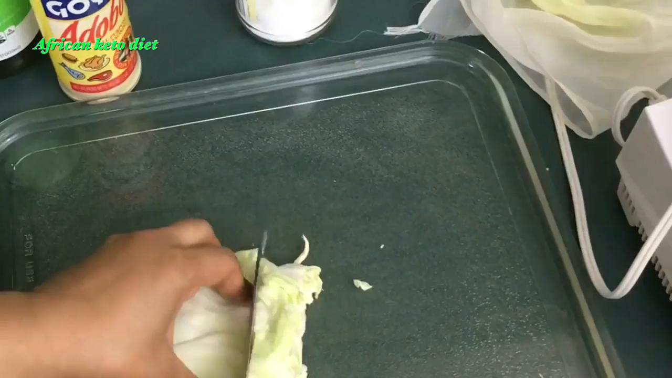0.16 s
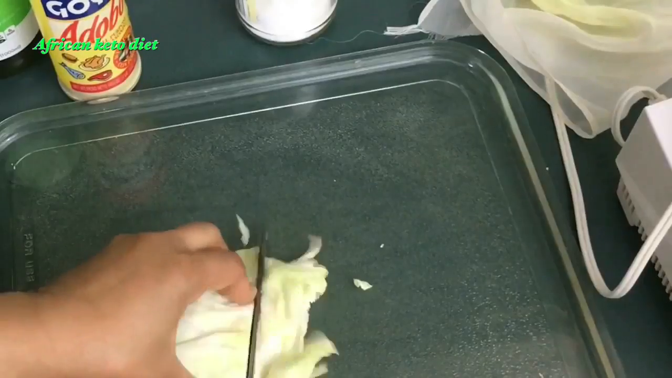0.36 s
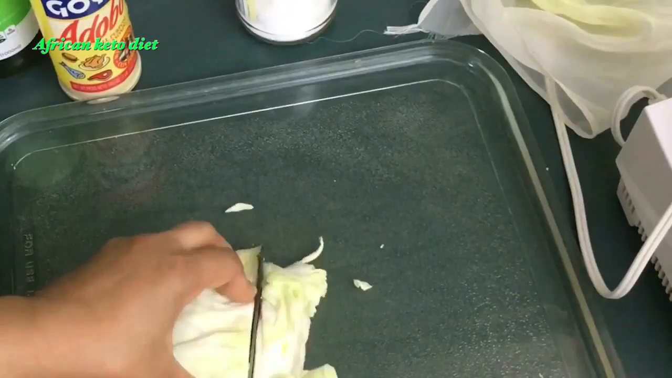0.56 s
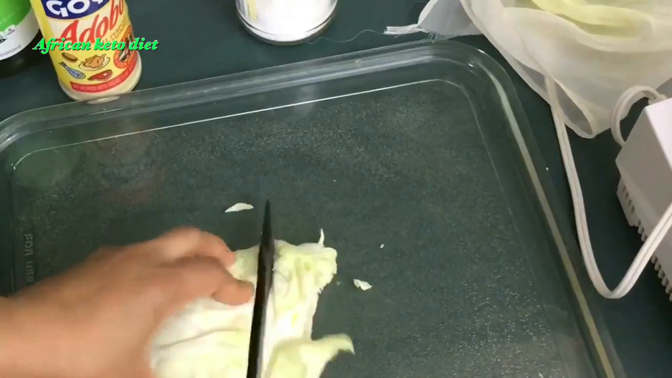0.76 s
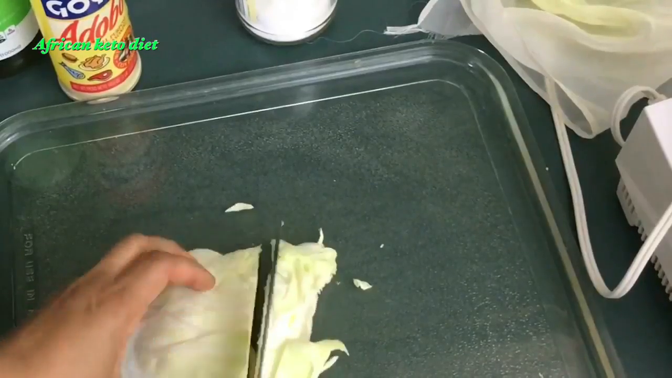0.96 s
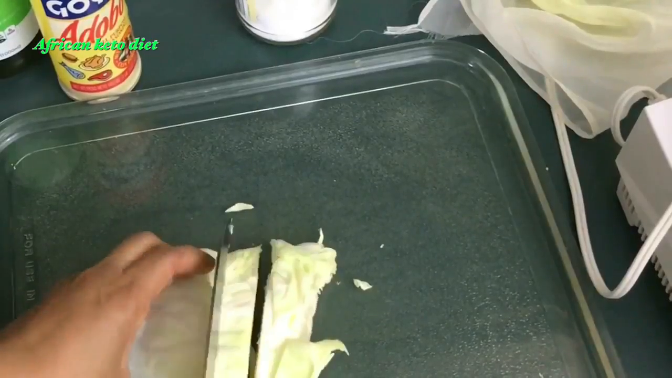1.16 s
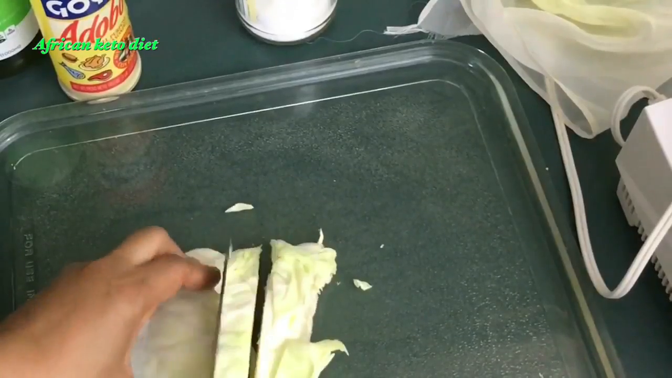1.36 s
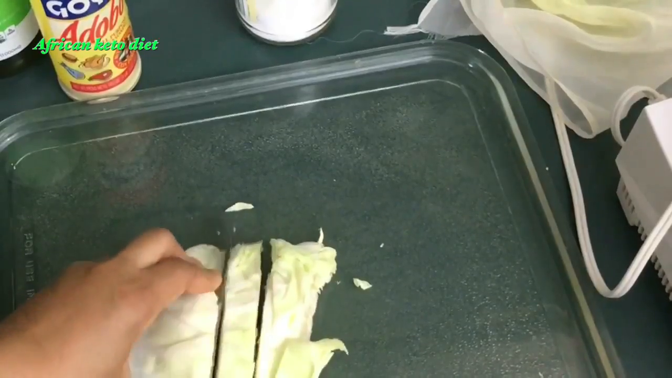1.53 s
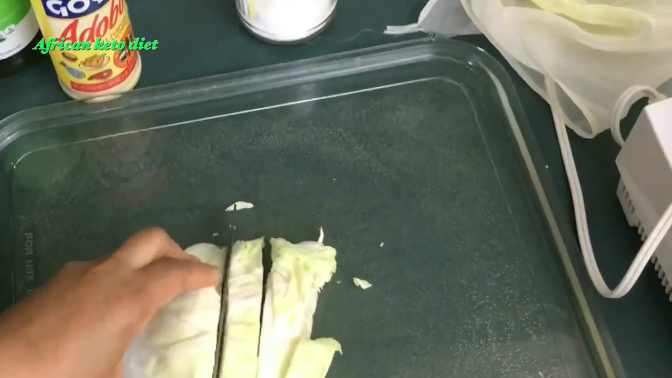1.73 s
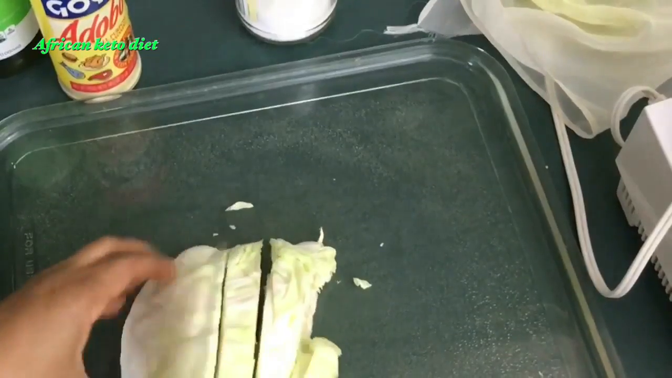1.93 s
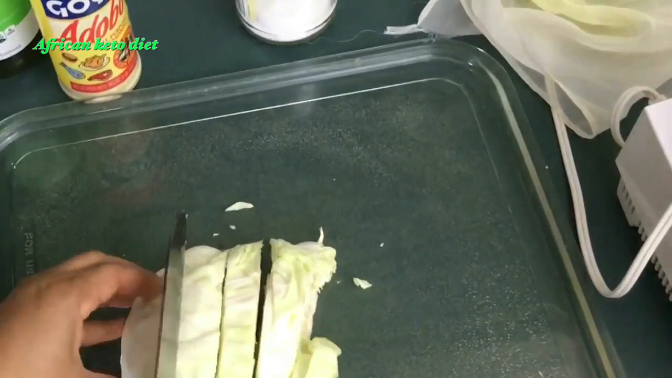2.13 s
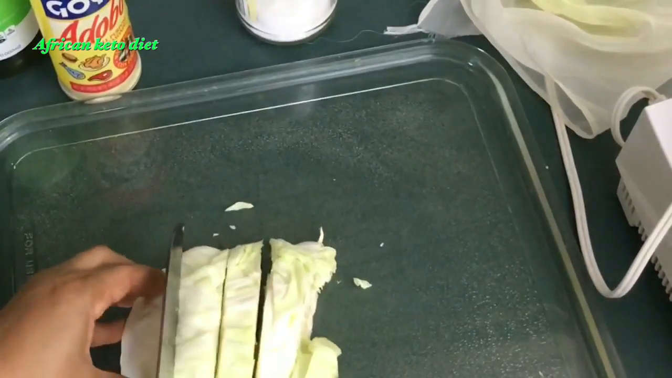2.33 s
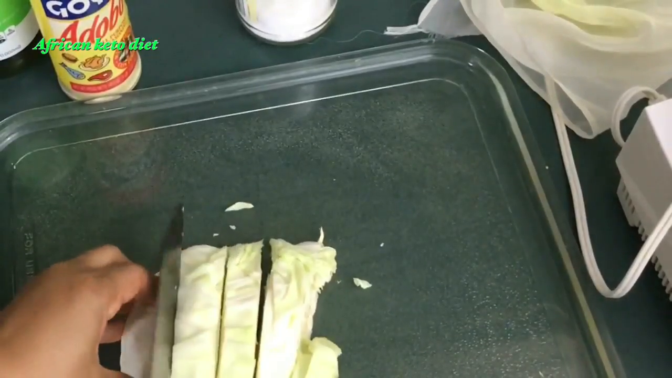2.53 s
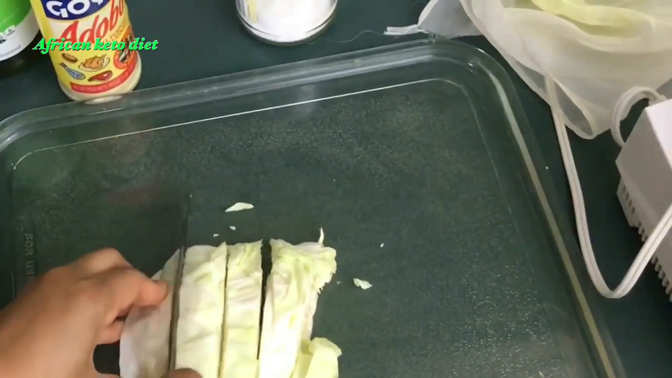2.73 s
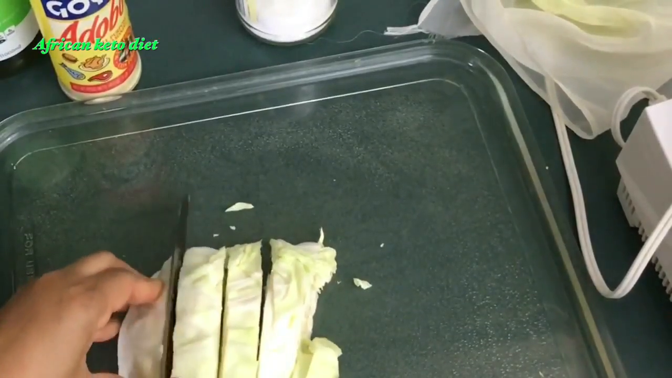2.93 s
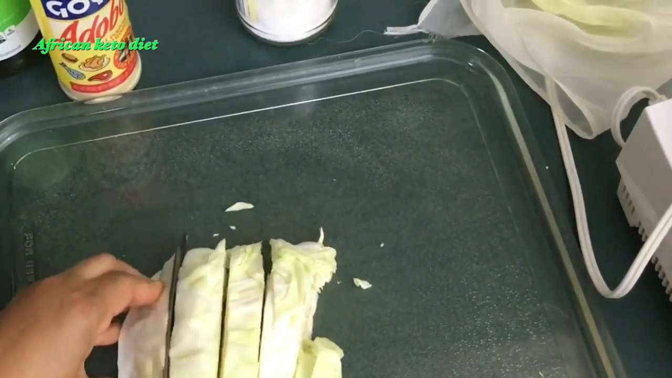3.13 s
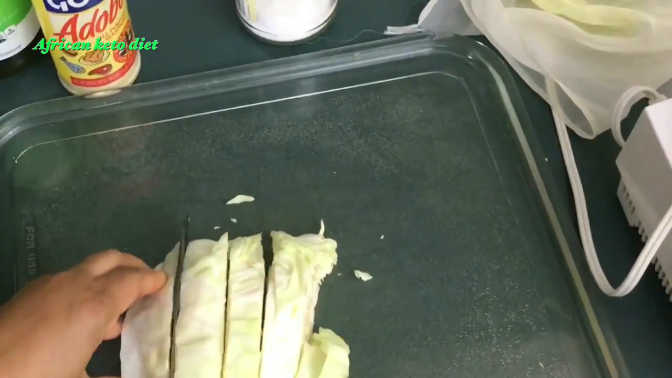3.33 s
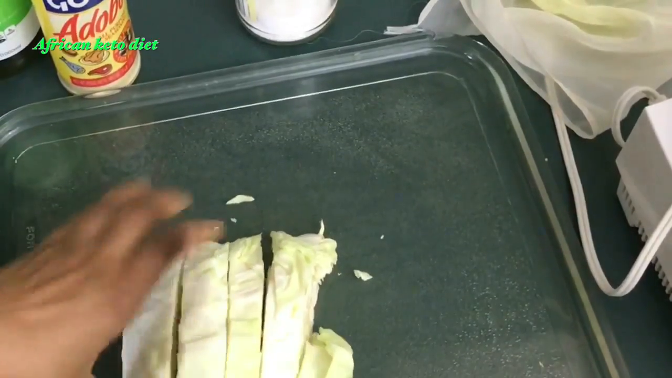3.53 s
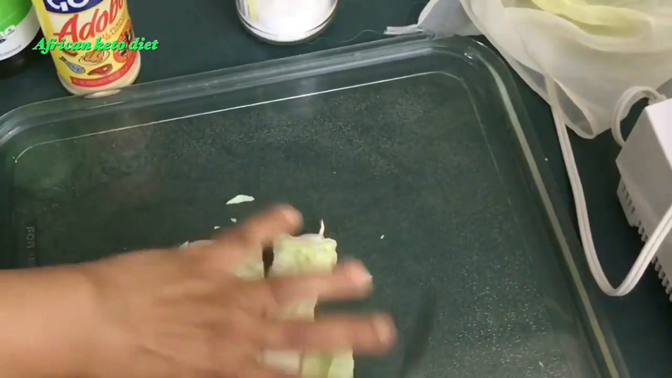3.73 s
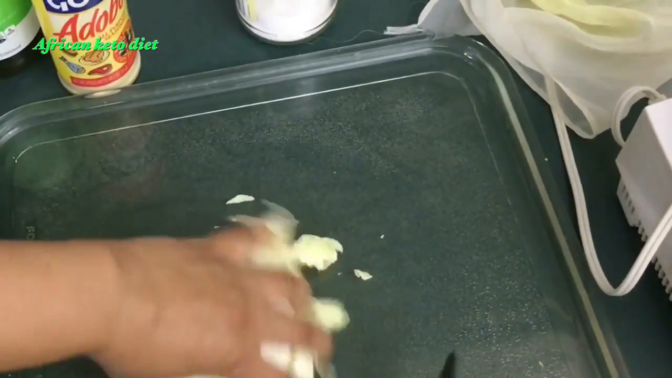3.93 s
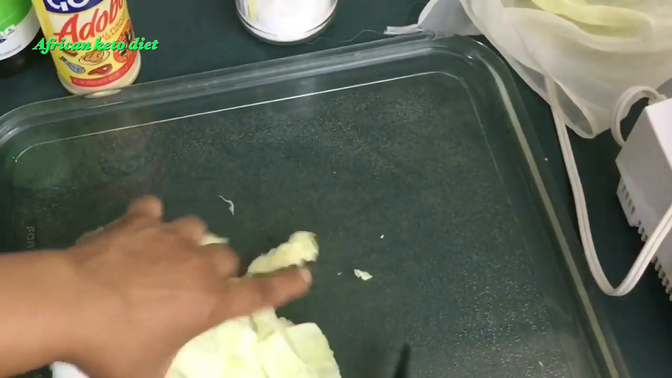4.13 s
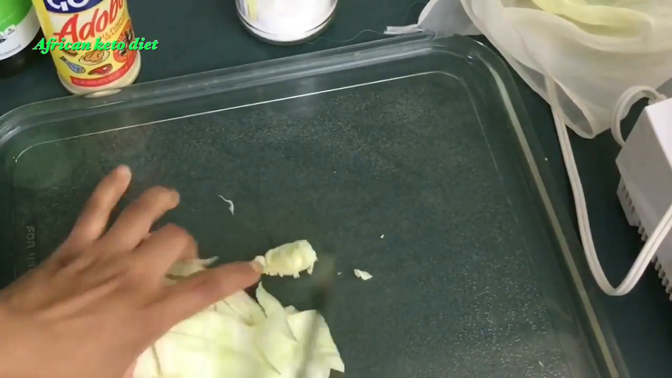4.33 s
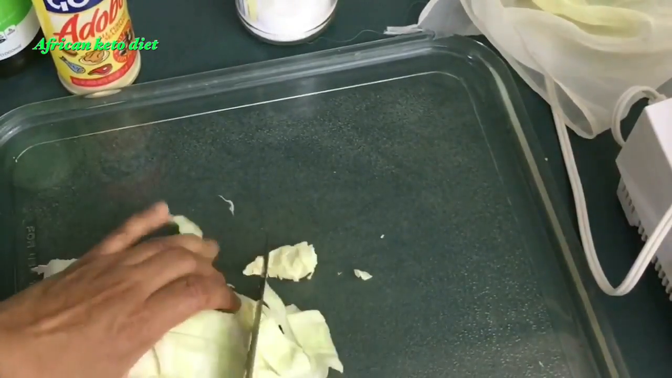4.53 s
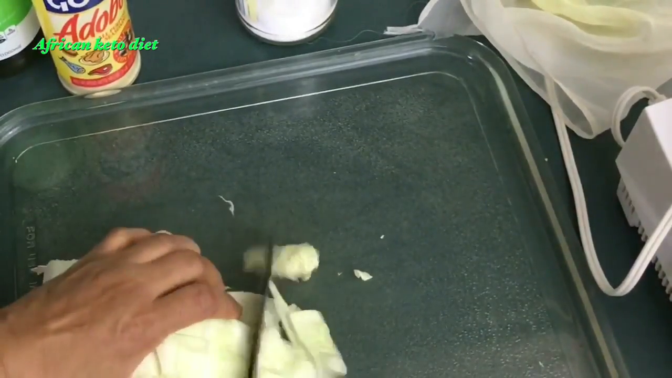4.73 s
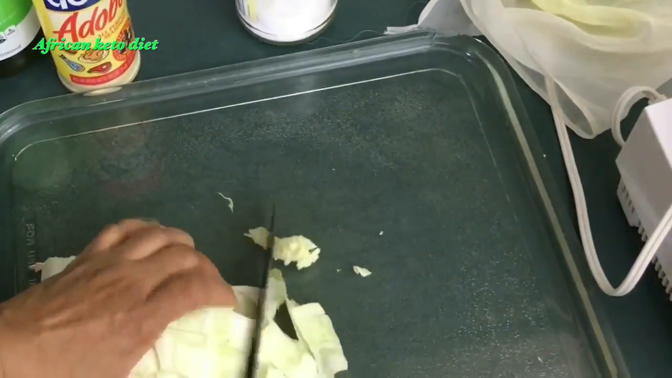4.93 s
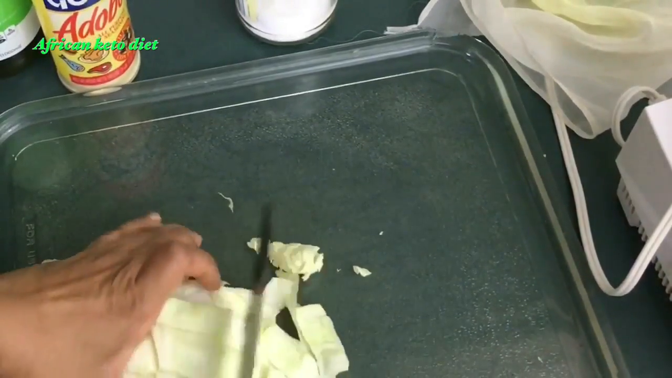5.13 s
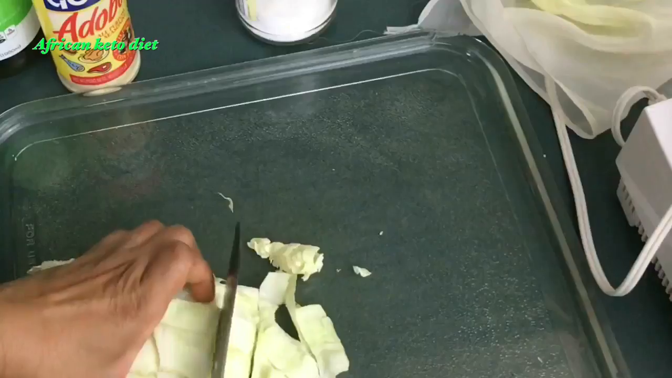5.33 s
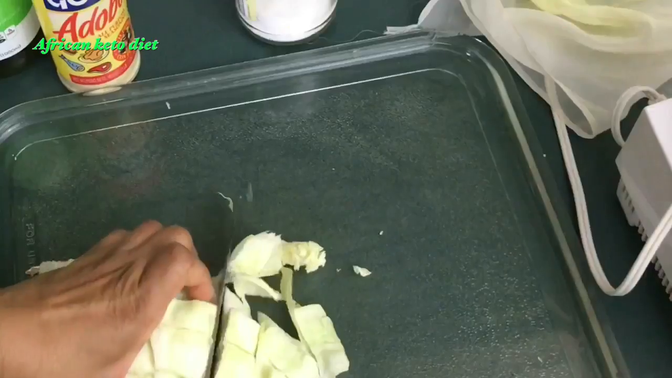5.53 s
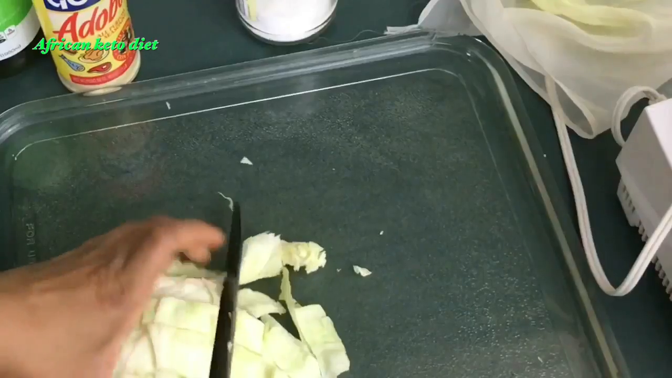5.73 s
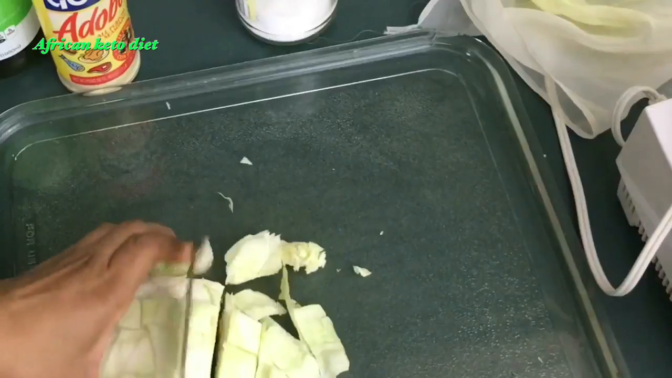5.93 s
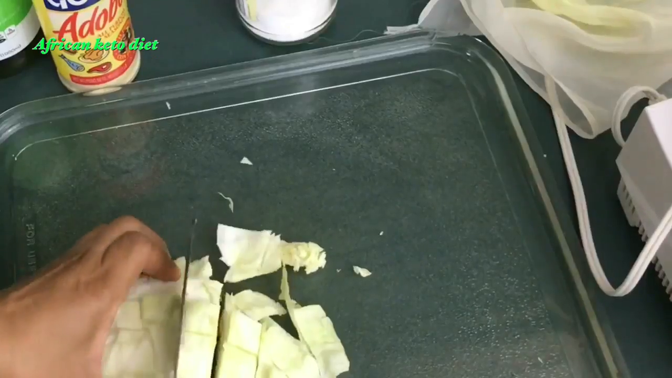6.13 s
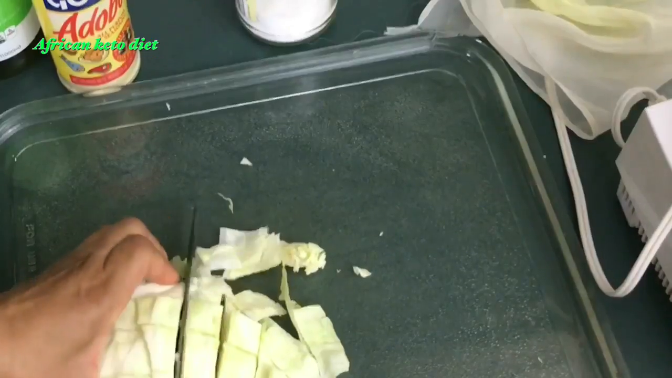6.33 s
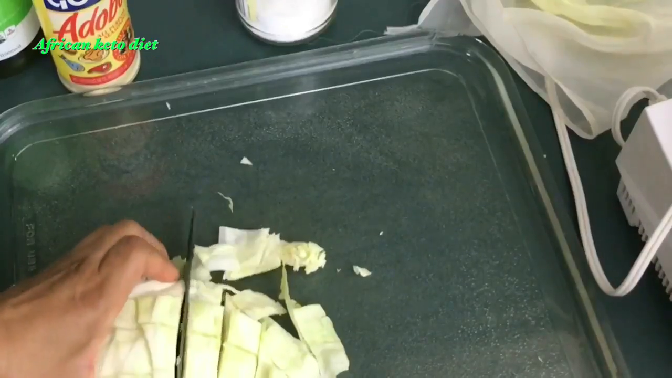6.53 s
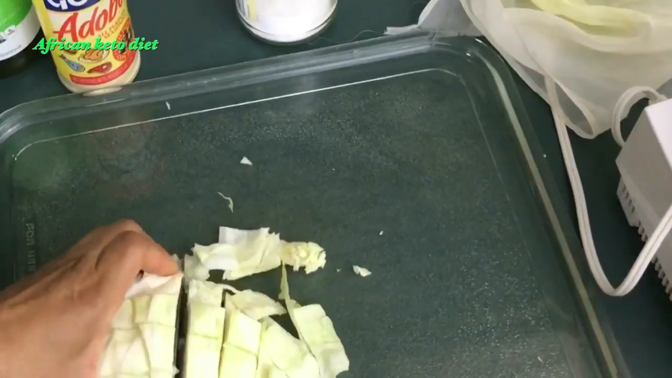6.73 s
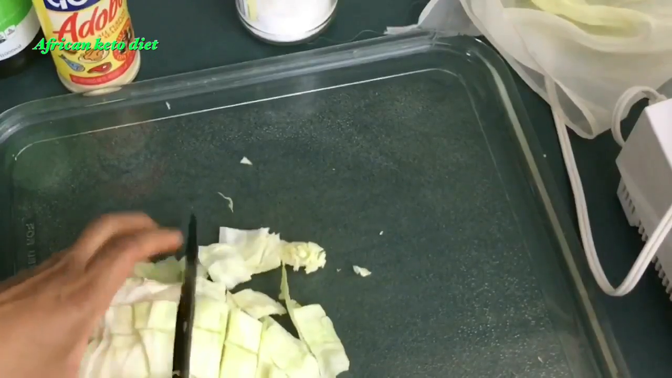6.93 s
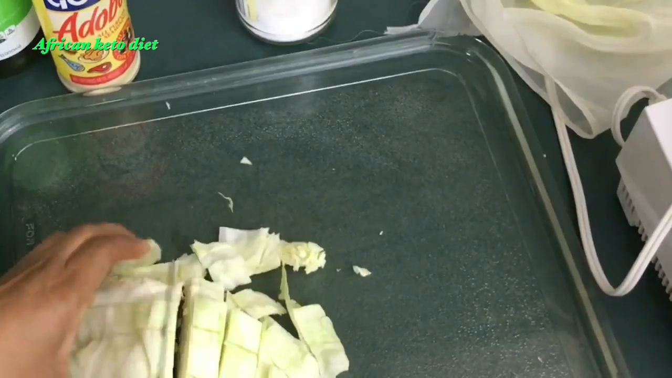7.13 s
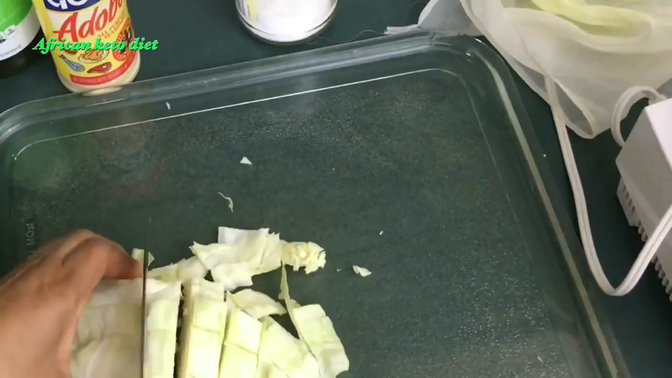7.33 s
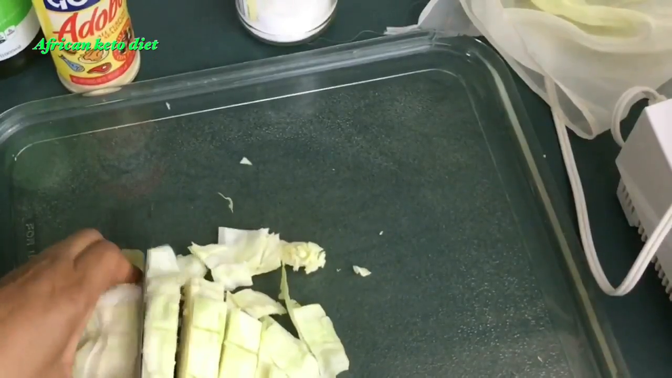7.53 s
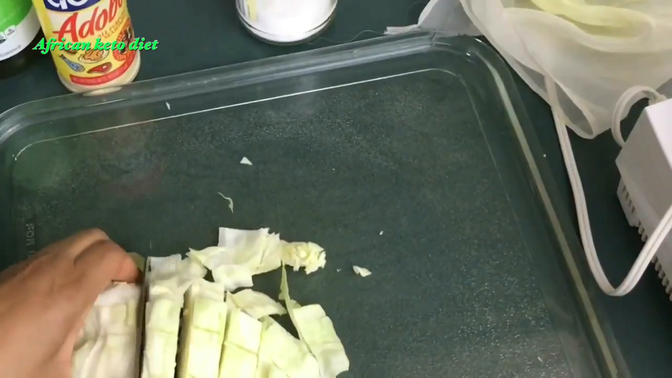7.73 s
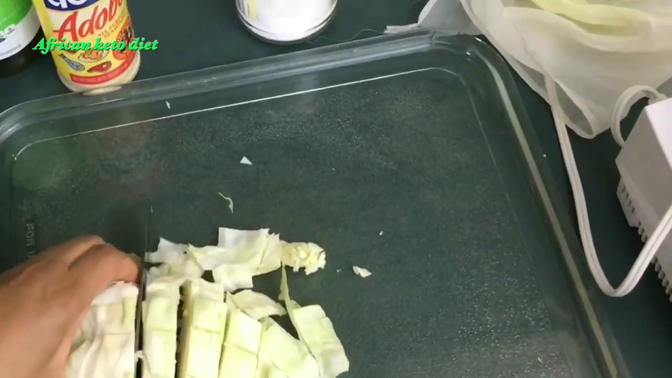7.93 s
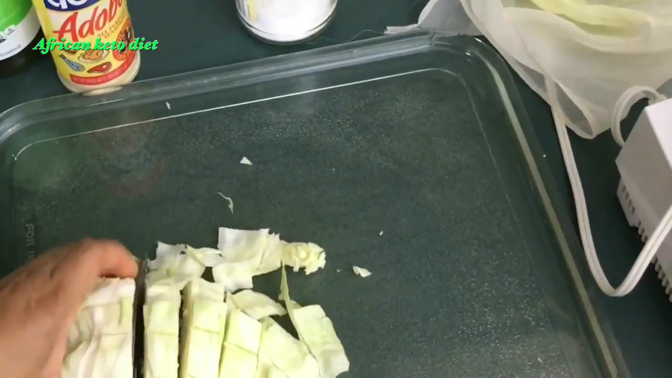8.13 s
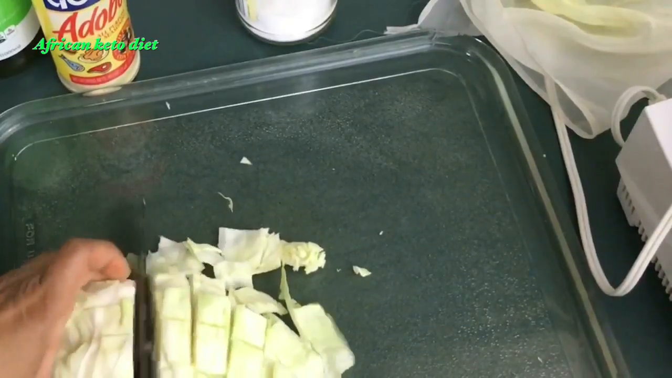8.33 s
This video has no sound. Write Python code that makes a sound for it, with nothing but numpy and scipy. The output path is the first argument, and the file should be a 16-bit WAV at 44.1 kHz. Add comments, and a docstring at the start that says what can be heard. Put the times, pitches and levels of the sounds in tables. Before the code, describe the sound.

Crisp leaves tear and thick ribs pop under a knife, each cut ending abruptly as steel knocks on glass. About nine heavy knocks come unevenly, roughly a second apart at first and closer in the middle, with small taps and rubbing between. The close microphone clips on the hardest hits; a short hard-surfaced kitchen echo follows, above faint air and low bumps.

```python
"""A small kitchen: a knife cuts a cabbage in a glass dish on a counter, close to the microphone.
In each stroke random clicks crunch as leaves and noise bursts snap as ribs; then steel knocks on glass,
a noise clack with ringing sine modes that overloads the microphone into flat peaks.
Scrapes of stick-slip clicks, narrow squeaks, a low judder and counter rumble lie beneath.
Behind it all are quiet air in shaped noise and the kitchen's echo in decaying noise bands."""
import sys
import numpy as np
from scipy import signal
from scipy.fft import rfft, irfft
from scipy.io import wavfile
from scipy.ndimage import uniform_filter1d

SR = 44100
rng = np.random.default_rng(int(sys.argv[2]) if len(sys.argv) > 2 else 0)


def file_out(sig):
    """Save sig as 16-bit WAV at sys.argv[1]."""
    # one column per channel
    cols = np.atleast_2d(sig).T
    # limit, then scale
    lim = np.clip(cols, -1, 1)
    pcm = np.round(lim * 32767).astype(np.int16)
    wavfile.write(sys.argv[1], SR, pcm)


N = 373527
TIME = np.arange(N) / SR


def from_db(db):
    """Decibels to gain."""
    return 10 ** (np.asarray(db) / 20)


def rms_one(x):
    """Scale to rms 1."""
    return x / np.sqrt(np.mean(x ** 2) + 1e-20)


def at_hz(points, hz):
    """Read a curve on a log-frequency axis."""
    freq, value = np.transpose(points)
    return np.interp(np.log(np.maximum(hz, 1)), np.log(freq), value)


def add(out, start_s, sound):
    """Mix a sound in at its moment."""
    i = max(0, round(start_s * SR))
    out[i:i + len(sound)] += sound[:N - i]


def colour(x, spectrum, size=2048):
    """Causal (minimum-phase) filter with the given spectrum."""
    level_db = at_hz(spectrum, np.fft.rfftfreq(size, 1 / SR))
    cepstrum = irfft(np.log(from_db(level_db)))
    # fold the cepstrum forward in time
    cepstrum[1:size // 2] *= 2
    cepstrum[size // 2 + 1:] = 0
    response = irfft(np.exp(rfft(cepstrum)))
    return signal.oaconvolve(x, response)[:len(x)]


def band_filter(x, low_hz, high_hz):
    """Second-order Butterworth design keeping one band of a sound."""
    sos = signal.butter(2, [low_hz, high_hz], "band", fs=SR, output="sos")
    return signal.sosfilt(sos, x)


def fade(t, t60):
    """Exponential decay, 60 dB in t60 seconds."""
    return np.exp(-np.log(1000) * t / max(t60, 1e-3))


def ring(clicks, hz, t60):
    """Two-pole resonator: a unit click sets a decaying sine of height 1 ringing."""
    r, w = fade(1 / SR, t60), 2 * np.pi * hz / SR
    return signal.lfilter([0, np.sin(w)], [1, -2 * r * np.cos(w), r * r], clicks + 1e-18)


def stroke_gain(starts, lengths, levels_db, swells_db, attack_s, release_t60):
    """Every stroke sets in, swells or sags evenly over its length, then dies away."""
    t, gain = TIME[:SR], np.zeros(N)
    for start_s, length_s, level_db, swell_db in np.broadcast(starts, lengths, levels_db, swells_db):
        progress = np.minimum(t / length_s, 1)
        held = from_db(level_db + swell_db * (progress - .5))
        release = fade(np.maximum(t - length_s, 0), release_t60)
        add(gain, start_s, held * (1 - np.exp(-t / attack_s)) * release)
    return gain


def grains(per_s, spread_db):
    """Random clicks of uneven size, with a steady power over a few hundredths of a second."""
    born = rng.random(N) < per_s / SR
    size = from_db(spread_db * np.minimum(rng.exponential(1, N), 4))
    clicks = born * size * rng.choice([-1, 1], N)
    power = np.abs(uniform_filter1d(clicks ** 2, size=1300))
    return clicks / np.sqrt(power + 1e-6)


def near_echoes(x, t60, wet_db):
    """Reflections from the dish, the hand and the counter smear each click over milliseconds."""
    t = TIME[:SR // 10]
    smear = rng.standard_normal(len(t)) * fade(t, t60)
    smear *= from_db(wet_db) / np.linalg.norm(smear)
    smear[0] += 1  # the direct sound
    return signal.oaconvolve(x, smear / np.linalg.norm(smear))[:len(x)]


# clear modes of the glass dish: pitch_hz, level_db, ring_t60_s
GLASS_MODES = [(412, -4, .2), (515, -6, .22), (645, -2, .22), (895, -2, .22), (1010, -6, .2),
               (1260, -4, .17), (1700, 0, .15), (2312, -8, .15), (2669, -6, .2), (3475, -7, .17),
               (3766, -4, .17), (3951, -2, .19), (4048, -4, .17), (4546, -6, .15), (5215, -5, .15),
               (5359, -3, .15), (5544, -7, .15), (6078, -4, .16), (6695, -4, .16), (6845, -6, .16),
               (7005, -4, .15), (7515, -11, .14), (7660, -11, .14), (8412, -5, .15), (8600, -9, .15),
               (8968, -11, .13), (9275, -2, .15), (10965, -9, .13), (11167, -11, .13), (13230, -7, .12)]


def through_dish(x, boost_db, width_hz=45):
    """The dish lifts whatever excites it at its own modes."""
    peaks = 0
    for pitch_hz, level_db, _ in GLASS_MODES:
        width = width_hz * (1 + pitch_hz / 9000)  # high modes are broader
        b, a = signal.iirpeak(pitch_hz, pitch_hz / width, fs=SR)
        peaks = peaks + from_db(level_db) * signal.lfilter(b, a, x)
    return x + from_db(boost_db) * peaks


# still air of the kitchen, relative spectrum: pitch_hz, level_db (per Hz)
AIR_SPECTRUM = [(15, -51), (25, -10.5), (76, -2.5), (114, -13), (236, -6), (427, -20.5), (936, -19.5),
                (1560, -24), (1740, -22.5), (2610, -30.5), (7510, -33), (8140, -33.5), (10400, -39.5),
                (14800, -38), (16000, -43)]


def kitchen_air(level_db=-43):
    """Steady noise shaped like the still air of the kitchen."""
    return from_db(level_db) * rms_one(colour(rng.standard_normal(N), AIR_SPECTRUM, size=8192))


# colour of the kitchen's echo: pitch_hz, level_db (per Hz)
ECHO_SPECTRUM = [(80, 15), (400, -1.5), (1200, 4), (3800, 4), (6500, -4), (10000, -8.5), (16000, -19)]
# how long the echo lasts: pitch_hz, decay_t60_s
ECHO_DECAY = [(100, 0.68), (600, 0.47), (3500, 0.57), (7000, 0.49), (15000, 0.58)]


def kitchen_echo(build_s=0.0028):
    """The room's answer to a click builds up after the first wall, each band of noise with its own decay."""
    t, response = TIME[:int(.8 * SR)], 0
    edges_hz = 45 * 2 ** np.arange(0, 9, .5)  # half-octave bands
    for low, high in zip(edges_hz, edges_hz[1:]):
        hz = np.sqrt(low * high)
        band = band_filter(rng.standard_normal(len(t)), low, high)
        shape = fade(t, at_hz(ECHO_DECAY, hz)) * (1 - np.exp(-(t / build_s) ** 2))
        response = response + from_db(at_hz(ECHO_SPECTRUM, hz)) * band * shape / np.linalg.norm(shape)
    return response


def kitchen(x):
    """What the room returns of a running sound."""
    return signal.oaconvolve(x, kitchen_echo())[:N]


# hand and blade settle on the cabbage with a soft push: start_s, length_s, level_db
PUSHES = [(0.0, 0.026, -35.5), (0.15, 0.06, -40), (1.226, 0.2, -42), (4.775, .05, -36),
          (5.348, 0.043, -37.5), (6.082, .05, -40), (7.38, 0.16, -37.5), (7.62, 0.1, -34),
          (7.793, 0.035, -39), (8.266, 0.14, -41)]


def rumble(cut_db=-16, follows=0.72):
    """The counter shakes under each push of the hand, and more sluggishly along with every cut."""
    low_spectrum = [(30, -17), (50, -6), (75, 4.5), (105, -6.5), (140, 1.0), (200, -13.0), (400, -30.5)]
    shake = rms_one(colour(rng.standard_normal(N), low_spectrum, size=8192))
    start_s, length_s, _, shudder_db, swell_db = np.transpose(CUTS)
    level_db = cut_db + follows * shudder_db
    cutting = stroke_gain(start_s, length_s, level_db, swell_db, attack_s=0.015, release_t60=0.24)
    pushing = stroke_gain(*np.transpose(PUSHES), 0, attack_s=0.0068, release_t60=0.28)
    return np.hypot(cutting, pushing) * shake


# the blade judders in the thick stalk: start_s, length_s, level_db
JUDDER = (2.9, 0.52, -38)


def judder(pitch_hz=91.5):
    """A low, even shaking, one sine, while the blade is forced down."""
    return stroke_gain(*JUDDER, 0, attack_s=.04, release_t60=0.72) * np.sin(2 * np.pi * pitch_hz * TIME)


# the edge or a wet leaf squeaks on the glass, and two brief high chirps sound near 4.2 s: middle_s, length_s,
# pitch_hz, level_db (before the swell)
SQUEAKS = [(0.928, 0.19, 3520, -44.5), (3.981, 0.38, 1970, -51.5), (4.155, 0.022, 6170, -32),
           (4.27, 0.036, 5330, -40), (4.46, .34, 1900, -44.5), (4.461, .3, 3740, -53),
           (6.666, .14, 3590, -40), (6.993, 0.24, 3480, -49)]


def squeaks():
    """Each squeak or chirp is one loose resonance, a narrow band of noise swelling and fading."""
    out = np.zeros(N)
    for middle_s, length_s, pitch_hz, level_db in SQUEAKS:
        swell = np.hanning(int(length_s * SR))
        tone = band_filter(rng.standard_normal(len(swell)), pitch_hz - 110, pitch_hz + 110)
        add(out, middle_s - length_s / 2, from_db(level_db) * swell * rms_one(tone))
    return out


# edge or cabbage dragged over the glass: start_s, length_s, level_db, swell_db (over the length)
SCRAPES = [(0.662, 0.21, -37, -3), (3.953, 0.6, -50, -7), (5.813, 0.052, -34, -6), (6.144, .035, -49, 6),
           (6.65, 0.13, -41.5, 5), (6.768, .012, -34, 0), (6.8, 0.19, -34.5, 7), (8.287, .18, -34, -10)]
# colour of the rubbing: pitch_hz, level_db (per Hz)
SCRAPE_SPECTRUM = [(120, -60), (200, -19), (316, -14), (409, 2.5), (647, 0.5), (735, -2), (1080, 1),
                   (1180, -6), (2090, -1.5), (3490, -8), (4950, -12), (6880, -10.5), (16000, -19.5)]


def scrapes(slips_per_s=1100, spread_db=3.5):
    """Edge or cabbage sticks and slips on the glass, which rings along."""
    slips = near_echoes(grains(slips_per_s, spread_db), t60=0.023, wet_db=5.5)
    rub = rms_one(through_dish(colour(slips, SCRAPE_SPECTRUM), boost_db=4.5))
    return rub * stroke_gain(*np.transpose(SCRAPES), attack_s=0.0086, release_t60=0.14)


# colour of a breaking leaf, for veins, fibres and ribs: pitch_hz, level_db (per Hz)
LEAF_SPECTRUM = [(150, -11.5), (300, 5.5), (750, -21), (1100, 7), (1600, -4.5), (2300, -2.5), (3000, -7),
                 (4200, -0.5), (6500, -7), (8400, -7.5), (10400, -10.5), (13000, -8), (16000, -11)]


def pops(per_s, spread_db, cycles):
    """Thicker veins pop now and then, each ringing briefly at one of twelve pitches."""
    clicks, pitches_hz = grains(per_s, spread_db), np.geomspace(1900, 5500, 12)
    dealt = rng.integers(0, len(pitches_hz), N)
    out = np.zeros(N)
    for k, hz in enumerate(pitches_hz):
        out += from_db(at_hz(LEAF_SPECTRUM, hz)) * ring(clicks * (dealt == k), hz, cycles / hz)
    return out


# hollow resonances of the cabbage on the dish: pitch_hz, level_db, ring_t60_s
HOLLOW_MODES = [(393.8, -2.5, 0.076), (421, -0.5, 0.046), (522, -2.5, 0.037), (630, -2.5, 0.051),
                (901, 1, 0.021)]


def hollow_ring(jolts):
    """Jolts set the cabbage's hollow resonances ringing, neighbours in opposite polarity."""
    out = np.zeros(N)
    for k, (pitch_hz, level_db, t60) in enumerate(HOLLOW_MODES):
        out += (-1) ** k * from_db(level_db) * ring(jolts, pitch_hz, t60)
    return out


# the edge goes through a layer of leaves:
# start_s, length_s, tearing_db, shudder_db (of cabbage and dish), swell_db (over the length)
CUTS = [(0.0, 0.019, -37.5, -30, -16), (0.054, 0.022, -37.5, -41, -1), (0.087, 0.027, -28.5, -25, -6),
        (0.121, 0.028, -25.5, -23, 13), (0.171, 0.012, -39, -28, -2), (0.26, .013, -24.5, -25, -1),
        (0.287, 0.063, -40, -42, -5), (0.392, 0.035, -25, -26, 7.5), (0.428, 0.065, -19, -17, 0.5),
        (1.338, 0.018, -33, -36, -7), (1.398, 0.027, -43, -60, 5), (1.486, .03, -27, -25.5, 12),
        (1.522, 0.1, -22.5, -17.5, -3.5), (1.613, 0.072, -18, -18, 3), (2.492, .035, -29.5, -26.5, -4),
        (2.567, .02, -32, -31, 0), (2.594, .014, -25, -22.5, 2), (2.623, .012, -26, -25, 1),
        (2.668, 0.036, -30, -27, 6), (2.711, 0.062, -22.5, -20.5, 8), (2.776, 0.093, -23, -22, 6.5),
        (2.934, 0.024, -37, -31.5, -6), (3.063, 0.032, -37.5, -52, 10), (3.101, .085, -33, -49, -0.5),
        (3.235, 0.087, -33, -31.5, 22), (4.743, 0.092, -40, -34.5, 2), (4.848, 0.024, -21.5, -12, -1.5),
        (4.892, .012, -18, -32, 9), (5.446, 0.097, -35, -33, 5), (5.53, 0.073, -18.5, -17, -1),
        (6.211, 0.019, -35, -36, -3), (6.242, .05, -31, -23, 4), (6.314, 0.12, -20.5, -18.5, -8.5),
        (7.485, 0.011, -25.5, -27.5, -8), (7.575, 0.041, -29.5, -31.5, 10), (7.622, 0.069, -20.5, -21.5, 0),
        (7.696, 0.039, -36, -27.5, -12), (7.793, 0.12, -43, -52, -6), (7.929, 0.041, -26.5, -29, 8),
        (7.971, 0.098, -22, -26.5, 2)]


def crunch(tear_db=-0.5, pop_db=-9.5, shudder_db=-3.0):
    """Fibres burst ahead of the edge; the same jolts, evened out by the flesh, shake the hollow resonances."""
    bursts = grains(per_s=1050, spread_db=4.2)
    smeared = near_echoes(bursts, t60=.025, wet_db=0)
    fibres = rms_one(through_dish(colour(smeared, LEAF_SPECTRUM), boost_db=-9))
    veins = rms_one(near_echoes(pops(per_s=130, spread_db=2.0, cycles=8.4), t60=0.039, wet_db=5.5))
    jolts = np.sign(bursts) * np.sqrt(np.abs(bursts))
    shudder = rms_one(hollow_ring(jolts))
    start_s, length_s, tears_db, shudders_db, swell_db = np.transpose(CUTS)
    # each cut sets in quickly and dies away once the layer is through
    tearing = stroke_gain(start_s, length_s, tears_db, swell_db, attack_s=0.0027, release_t60=0.086)
    shaking = stroke_gain(start_s, length_s, shudders_db, swell_db, attack_s=0.0034, release_t60=0.079)
    torn = (from_db(tear_db) * fibres + from_db(pop_db) * veins) * tearing
    return torn + from_db(shudder_db) * shudder * shaking


# thick ribs snapping: start_s, level_db (relative strength)
SNAPS = [(0.055, -18), (0.0879, -12.5), (0.1351, -11.5), (0.179, -11.5), (0.2637, -17.5), (0.4063, -15),
         (1.338, -21), (1.3531, -22.5), (1.3989, -19.5), (1.4774, -26.5), (1.495, -15.5), (1.6051, -11),
         (2.4578, -22), (2.5707, -19.5), (2.595, -9), (2.6243, -8), (2.7002, -9), (2.718, -3.5),
         (2.803, -5.5), (2.835, -5.5), (3.1, -20), (4.586, -26), (4.776, -21.5), (4.8464, -6),
         (5.426, -28.5), (5.486, -15), (5.531, -9.5), (6.2143, -21), (6.261, -11.5), (6.319, -32),
         (7.3535, -29.5), (7.583, -18), (7.6228, -15), (7.877, -23), (8.2948, -21)]


def snaps(crack_db=-8, crack_t60=0.042, hollow_db=-36):
    """A thick rib gives way in one short crack of noise and jolts the cabbage."""
    t, cracks = TIME[:SR // 10], np.zeros(N)
    for start_s, level_db in SNAPS:
        add(cracks, start_s, from_db(level_db) * rng.standard_normal(len(t)) * fade(t, crack_t60))
    crisp = colour(cracks, LEAF_SPECTRUM)
    crisp *= np.std(cracks) / np.std(crisp)
    return from_db(crack_db) * crisp + from_db(hollow_db) * hollow_ring(cracks)


# treble of the cutting over time: time_s, treble_db
LEAF_TREBLE = [(0.15, 1.5), (0.45, -4), (1.6, 0), (2.8, -7), (3.15, 3.5), (4.85, 2), (5.55, -0.5),
               (6.35, 0.5), (7.65, 1), (8.0, -4)]


def crispen(x, corner_hz=6000):
    """Firm leaves break with more treble than limp ones."""
    treble = signal.sosfiltfilt(signal.butter(2, corner_hz, "high", fs=SR, output="sos"), x)
    gain = from_db(np.interp(TIME, *np.transpose(LEAF_TREBLE)))
    return x + (gain - 1) * treble


# crowded, quickly damped modes of blade and dish: pitch_hz, level_db (per Hz)
CLACK_SPECTRUM = [(50, -18.5), (140, -11.5), (290, -9), (410, -1), (700, 0), (1200, -2.5), (2200, -5.5),
                  (4200, -5.5), (4950, -9), (6600, -3.5), (8000, -12), (11500, -13), (16000, -20.5)]
# modes of the counter under the dish: pitch_hz, level_db, ring_t60_s
COUNTER_MODES = [(75.3, -8, 0.1), (131, -7.5, 0.23), (146, -7, 0.31), (243.5, -5, 0.14)]
# blade meets glass: start_s, clack_db, clack_t60_s, treble_db (tilt reached at 8 kHz), favoured_hz,
# ring_db (glass), thump_db (counter), room_db (echo against the blow)
KNOCKS = [(0.5007, -1, 0.12, 5.5, 3470, -19, -34, -6), (0.6850, -26.5, 0.093, -26, 650, -63, -35, -14),
          (0.929, -26, 0.14, -15, 453, -45, -40, -26), (1.6715, -3.5, 0.2, -9.5, 4500, -19.5, -6.5, -5),
          (3.3227, -2.5, 0.094, -0.5, 4240, -18, -21, -8.5),
          (4.1690, -0.5, 0.045, -6.5, 1500, -19.5, -27, -12), (4.9043, -3.5, 0.12, 0.5, 1820, -16, -26, -7),
          (5.6058, -3, 0.13, 0, 3100, -16, -23, -7.5), (6.4248, -1, 0.12, -3.5, 1250, -35, -10, -9.5),
          (6.7797, -1.5, 0.056, 2.5, 2620, -27.5, -37, -12.5),
          (6.9160, -24.5, 0.1, -12, 1700, -37.5, -50, -24),
          (8.0541, 2, 0.05, -2.5, 3550, -25.5, -16.5, -11),
          (8.2158, -14.5, 0.053, -19, 1870, -45, -41, -6.5), (8.308, -29, 0.3, -13, 2000, -39, -52, -6)]


def knocks(favoured_db=5, favoured_octaves=0.54, contact_s=0.00017):
    """Steel on glass: a dense clack, the dish's clear modes, a thump and the room's answer."""
    t, out = TIME[:SR // 2], np.zeros(N)
    grid_hz = np.geomspace(50, 16000, 120)
    for start_s, clack_db, clack_t60, treble_db, favoured_hz, ring_db, thump_db, room_db in KNOCKS:
        # a hard contact is bright, and the place of the blow favours one group of modes
        octaves_off = np.log2(grid_hz / favoured_hz)
        favour = favoured_db * np.exp(-(octaves_off / favoured_octaves) ** 2)
        body = at_hz(CLACK_SPECTRUM, grid_hz) + at_hz([(3800, 0), (8000, treble_db)], grid_hz)
        noise = colour(rng.standard_normal(len(t)), np.c_[grid_hz, body + favour])
        clack = through_dish(noise, boost_db=-6.0)
        blow = from_db(clack_db) * rms_one(clack) * fade(t, clack_t60)
        for modes, level_db in (GLASS_MODES, ring_db), (COUNTER_MODES, thump_db):
            for hz, mode_db, mode_t60 in modes:
                chance_db = rng.uniform(-3, 3)
                strength_db = level_db + mode_db + np.interp(hz, grid_hz, favour) + chance_db
                strength = from_db(strength_db) * rng.choice([-1, 1])
                blow += strength * np.sin(2 * np.pi * hz * t) * fade(t, mode_t60)
        blow *= 1 - np.exp(-t / contact_s)
        answer = colour(kitchen_echo(), np.c_[grid_hz, body + favour / 2])
        echo = through_dish(near_echoes(answer, t60=0.029, wet_db=-2.5), boost_db=-9.0)
        add(out, start_s, blow)
        add(out, start_s, from_db(room_db) * echo * np.linalg.norm(blow) / np.linalg.norm(echo))
    return out


def scene(leaf_room_db=-12):
    """Cutting and knocking in the kitchen, over its quiet air."""
    background = kitchen_air() + rumble() + judder()
    cutting = squeaks() + scrapes() + crispen(crunch() + snaps())
    cutting_echo = from_db(leaf_room_db) * kitchen(cutting)
    return (background + cutting + cutting_echo + knocks())[None]


def record(dry, cutoff_hz=15850):
    """The microphone drops the deepest bass, the loudest peaks are clipped flat, and the top is cut."""
    thinned = signal.sosfilt(signal.butter(4, 36, "high", fs=SR, output="sos"), dry)
    clipped = np.clip(thinned, -.97, .97)
    return signal.oaconvolve(clipped, signal.firwin(301, cutoff_hz, fs=SR)[None], mode="same")


dry = scene()
out = record(dry)
file_out(out)
```